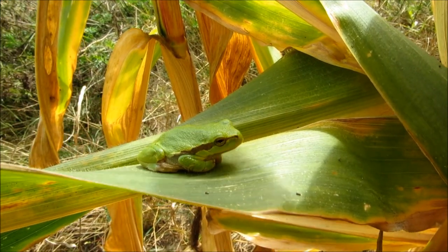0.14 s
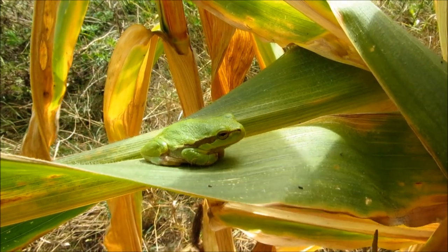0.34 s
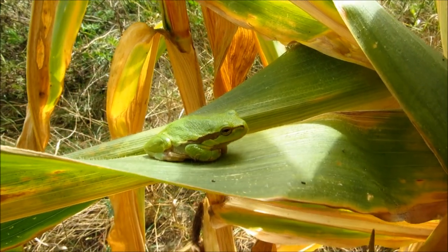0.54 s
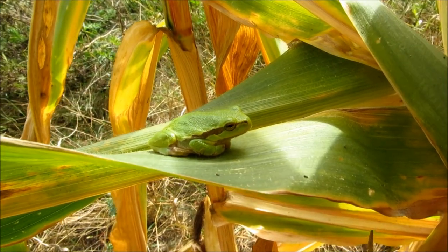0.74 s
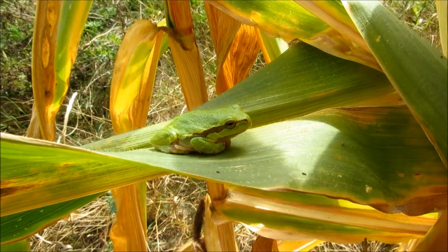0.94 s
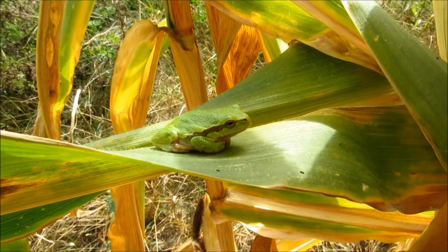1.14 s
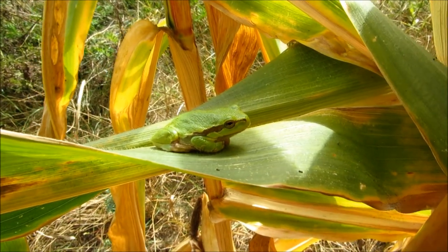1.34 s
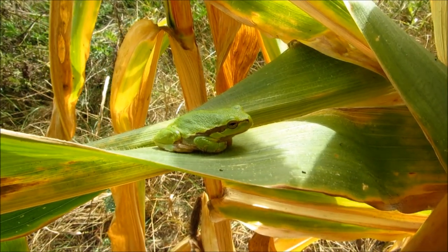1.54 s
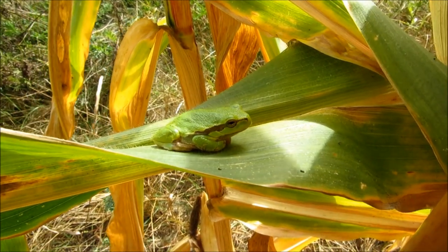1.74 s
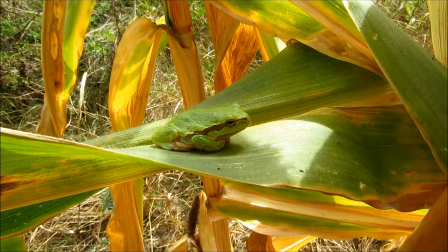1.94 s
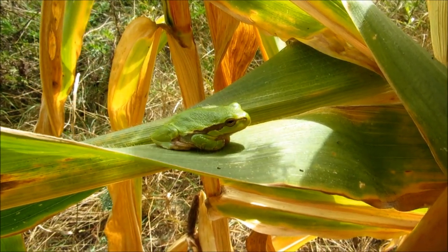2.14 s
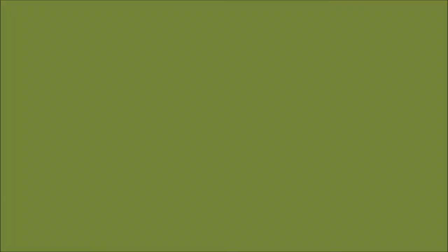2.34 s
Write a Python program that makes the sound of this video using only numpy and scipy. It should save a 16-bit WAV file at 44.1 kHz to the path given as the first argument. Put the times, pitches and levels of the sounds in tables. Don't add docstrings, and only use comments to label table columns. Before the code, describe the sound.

Dry maize leaves rustle and crackle close to a stereo microphone outdoors; small snaps and soft hollow stalk knocks come unevenly, wind bumps low at first, then a sharp tear near the middle, and calmer hiss until a quick fade.

```python
import sys
import numpy as np
from scipy import signal
from scipy.fft import rfft, irfft
from scipy.io import wavfile
from scipy.ndimage import uniform_filter1d

SR = 44100
rng = np.random.default_rng(int(sys.argv[2]) if len(sys.argv) > 2 else 0)


def linear_from_db(decibels):
    return 10 ** (np.asarray(decibels, float) / 20)


def store_wav(level_fs):
    pcm = np.round(np.clip(np.atleast_2d(level_fs), -1, 1) * 32767)
    wavfile.write(sys.argv[1], SR, pcm.T.astype(np.int16))


N = 105840
TIME_S = np.arange(N) / SR
NEAR_SIDE_DB = -8

# t/s, level/dB, brightness/dB
BREEZE = [(0, -49, -4.5), (.2, -47, -5), (0.401, -49, -3.5), (.6, -47.5, -6), (.8, -44.5, -4),
          (0.961, -48, -5), (1.1, -44, -2), (1.25, -47.5, -4), (1.45, -46.5, -1), (1.7, -47, -2),
          (1.85, -49, -2.5), (2.13, -47, -1)]
# f/Hz, density/dB
LEAF_MID = [(53, -49), (90, -13), (161, -6), (400, -5.5), (590, -7), (686, -4), (1370, -2.5), (9180, -5.5),
            (15800, -12.5)]


def evened(x):
    return x / np.sqrt(np.mean(x ** 2) + 1e-20)


def read(points, hz):
    f, value = np.transpose(points)
    return np.interp(np.log(hz + 1), np.log(f + 1), value, left=-90, right=-90)


def add(mix, s, sound):
    part = mix[..., round(s * SR):round(s * SR) + sound.shape[-1]]
    part += sound[..., :part.shape[-1]]


def colour(x, db_at):
    n = x.shape[-1]
    gain = linear_from_db(db_at(np.fft.rfftfreq(n, 1 / SR)))
    return irfft(rfft(x) * gain, n)


def ring(x, hz, width_hz):
    r = np.exp(-np.pi * width_hz / SR)
    return signal.lfilter([1, -1], [1, -2 * r * np.cos(2 * np.pi * hz / SR), r * r], x)


def sides(mid, side):
    return np.array([mid + side, mid - side])


def hump(hz, centre_hz, octaves):
    away = np.log2((hz + 1) / centre_hz) / octaves
    return -6 * np.where(away < 0, away / 1.9, away) ** 2


def broad(x):
    return colour(x, lambda f: hump(f, 5000, 1.15))


def fold_burst(noise, fade_s):
    t = np.arange(noise.shape[-1]) / SR
    rise_s = 0.00048
    return noise * np.minimum(t / rise_s, 1) * np.exp(-t / max(fade_s, 3e-4))


def tear():
    # t/s, peak/dB, fade/s
    steps = [
        (1.067, -29, .0015),
        (1.0695, -26.5, 0.00087),
        (1.07, -17.5, 0.0011),
        (1.0741, -15, 0.00094),
        (1.0750, -11.5, 0.00097),
        (1.0765, -12, 0.0012),
        (1.0778, -20, .001),
        (1.0812, -21, 0.0012),
        (1.084, -30.5, 0.0018),
        (1.0890, -29.5, .002),
    ]
    # f/Hz, width/Hz, level/dB
    leaf = [(2350, 230, -6), (2995, 150, 1), (3650, 430, 4.5), (4600, 220, -9), (4800, 140, -7.5),
            (5455, 150, -0.5), (6400, 150, -1.5), (6840, 130, -8), (8000, 150, -8.5), (9830, 160, -9),
            (10810, 130, -11.5), (12000, 470, -19)]
    wide_db, damping, dulls_db, top_db = 0, 1.4, -120, 2
    out = np.zeros((2, N))
    noises = rng.standard_normal((len(steps), 2, 1300))
    for (s, peak_db, fade_s), noise in zip(steps, noises):
        burst = fold_burst(noise, fade_s)
        body = sum(linear_from_db(db) * width_hz / hz * ring(burst, hz, damping * width_hz)
                   for hz, width_hz, db in leaf)
        wide = broad(burst)
        both = body / abs(body[0]).max() + linear_from_db(wide_db) * wide / abs(wide[0]).max()
        late_s = max(s - steps[4][0], 0)
        both = colour(both, lambda f: dulls_db * late_s * np.log2(np.maximum(f, 2500) / 2500)
                      - top_db * (f / 12000) ** 6)
        mid, side = both / abs(both[0]).max()
        add(out, s, linear_from_db(peak_db) * sides(mid, linear_from_db(NEAR_SIDE_DB) * side))
    return out


def snaps():
    # t/s, peak/dB, ring f/Hz, brightness/dB, fade/s
    pops = [(.035, -36, 3000, -0.5, 0.0022), (0.045, -31.5, 2600, -11.5, 0.0017),
            (0.108, -32, 2900, -2, 0.0014), (0.1173, -33, 2880, -10.5, 0.0012),
            (.1915, -35, 3040, -8, .0012), (.243, -36.5, 9000, -3.5, 0.00089),
            (0.1473, -27.5, 2760, -18, 0.0016), (0.4663, -24.5, 4450, -11, 0.0013),
            (0.5536, -27, 3180, -3, 0.0024), (.6125, -31.5, 3550, -6, 0.0017),
            (0.685, -32, 4030, -10, .0012), (.8245, -28.5, 3020, -4.5, 0.0013),
            (.8374, -32, 6700, 2, 0.00084), (0.873, -31.5, 3080, -10.5, .001),
            (0.931, -35.5, 6300, -4.5, .001), (0.9365, -34, 6300, -4, .0008),
            (.9892, -36, 2900, -5, 0.0011), (1.0233, -32, 2820, 4.5, 0.0018), (1.043, -27, 2820, -6, .0013),
            (1.1067, -29, 3500, -5.5, 0.0011), (1.139, -31.5, 6500, -7.5, 0.00099),
            (1.1781, -23.5, 2780, -9.5, 0.00079), (1.3234, -26.5, 3250, -17, .0011),
            (1.344, -33.5, 3220, -12, .0008), (1.381, -33, 2470, -6, 0.0011),
            (1.4135, -32, 2400, -10, .0015), (1.419, -35, 3300, -6, .0015),
            (1.5159, -25.5, 7800, 3, 0.00044), (1.871, -32, 6800, -9.5, 0.00079)]
    out = np.zeros((2, N))
    noises = rng.standard_normal((len(pops), 2, 1300))
    for (s, peak_db, leaf_hz, bright_db, fade_s), noise in zip(pops, noises):
        burst = fold_burst(noise, fade_s)
        body = ring(ring(burst, leaf_hz, 0.2 * leaf_hz), leaf_hz, leaf_hz)
        wide = broad(burst)
        mid, side = body / abs(body[0]).max() + linear_from_db(bright_db) * wide / abs(wide[0]).max()
        add(out, s, linear_from_db(peak_db - 0.5) * sides(mid, linear_from_db(NEAR_SIDE_DB) * side))
    return out


def knocks():
    # t/s, peak/dB, ring length/(share of t60), tone/(dB per octave), top ring f/Hz
    blows = [(.0352, -33, .25, 5, 2100), (.071, -32, .4, -1, 1960), (.3303, -28, 0.56, 0, 2150),
             (.3322, -25, 0.56, 3.5, 2120), (0.3383, -29.5, 0.64, 10, 2150), (0.341, -30.5, .6, 2.5, 2100),
             (0.3487, -28.5, 0.42, 3.5, 2080), (.3521, -19.5, .6, 2.5, 2080), (.3555, -31, .6, -1, 2020),
             (0.466, -24.5, 0.56, 4, 1960), (0.5036, -26, .6, 3, 1840), (.5053, -23, .7, 3, 1840),
             (.508, -24, .45, 1, 1850), (.5538, -26.5, .3, 0, 1960), (.577, -27, 0.6, 6, 2110),
             (.722, -26.5, 0.68, 0.5, 1800), (.7618, -28, .35, 2, 2000), (.7985, -25.5, .5, 6, 2170),
             (0.819, -29, 0.78, 3, 1960), (1.076, -24, 0.5, -3, 1960), (1.107, -26, 0.4, -0.5, 1960),
             (1.3232, -26.5, 0.27, -1, 1670), (1.3262, -32.5, 0.43, -13, 1960),
             (1.3437, -28, 0.33, 1, 1960), (1.5161, -28.5, .4, 3, 1680), (1.519, -37, 0.31, 4, 1700),
             (1.8, -27.5, .3, -3, 1960)]
    # f/Hz, level/dB, t60/s
    stalk = [(408, -7.5, 0.044), (764, -4, 0.029), (1062, -0.5, 0.032), (1306, -2.5, 0.021),
             (1960, -1.5, 0.018)]
    spread_db, pan_db, tick_db = 1.2, -4, -9
    ragged, ragged_s, contact_s = 0.12, 0.0019, 0.00021
    out, t = np.zeros((2, N)), np.arange(2200) / SR
    luck = rng.standard_normal((len(blows), len(stalk), 2))
    noises = rng.standard_normal((len(blows), len(t)))
    for (s, peak_db, rings, tone_db, top_hz), chance, noise in zip(blows, luck, noises):
        share = max(rings, .1)
        blow = ragged * noise * np.exp(-t / ragged_s) + (t == 0)
        modes = [*stalk[:-1], (top_hz, *stalk[-1][1:])]
        body = np.zeros(len(t))
        for (hz, db, t60_s), (u, v) in zip(modes, chance):
            mode_db = db + tone_db * np.log2(hz / stalk[2][0]) + spread_db * u
            width_hz = 2.09 / t60_s / share
            body += linear_from_db(mode_db) * hz * ring(blow, hz * (1 + 0.013 * v), width_hz)
        soft_s = contact_s * share
        body = np.convolve(body, np.exp(-(t[:60] / soft_s - 2) ** 2))[:len(t)]
        tick = broad(np.roll(blow, 20))
        sound = body / abs(body).max() + linear_from_db(tick_db) * tick / abs(tick).max()
        add(out, s, linear_from_db(peak_db + np.array([[.5], [-.5]]) * pan_db) * sound)
    return out


def scrapes():
    # start t/s, length/s, rms/dB, centre f/Hz, spread/octaves
    strokes = [(0.035, 0.065, -47.5, 2970, 1.17), (0.105, 0.038, -47.5, 2820, 0.97),
               (0.189, 0.039, -51.5, 3000, 0.44), (0.252, 0.092, -44, 5100, 0.69),
               (0.445, 0.055, -50, 3870, 0.86), (0.495, 0.052, -42.5, 2970, 1.26),
               (0.601, 0.057, -45, 4000, 0.71), (0.773, 0.11, -46.5, 2500, 1.15),
               (0.879, 0.031, -41.5, 1800, 1.1), (0.89, 0.043, -37.5, 3300, 1.2),
               (0.929, 0.021, -48, 6000, 1.2), (1.007, 0.092, -49.5, 3540, 1.3),
               (1.064, 0.023, -33, 4494, 1.4), (1.078, 0.029, -36.5, 2200, 1.43),
               (1.099, 0.05, -43.5, 2480, 0.83), (1.172, 0.035, -36, 4000, 1.52),
               (1.41, 0.02, -41.5, 2760, 1.27), (1.662, 0.1, -50.5, 3960, 1.5),
               (1.98, 0.071, -46.5, 2500, .9)]
    slips_per_s, slip_db = 16000, 1.6
    out = np.zeros((2, N))
    slips = linear_from_db(slip_db * np.minimum(rng.exponential(1, N), 4)) * (rng.random(N) < slips_per_s / SR)
    slips = slips * rng.standard_normal((2, N)) + .6 * rng.standard_normal((2, N))
    for start_s, length_s, db, centre_hz, octaves in strokes:
        u = np.arange(0, length_s, 1 / SR) / length_s
        part = slips[:, round(start_s * SR):][:, :len(u)]
        part = colour(part, lambda f: hump(f, centre_hz, octaves))
        swell = np.sin(np.pi * u ** 0.69) ** 2
        mid, side = part / np.std(part[0]) * swell
        add(out, start_s, linear_from_db(db + 4.0) * sides(mid, linear_from_db(NEAR_SIDE_DB) * side))
    return out


def crackle():
    ticks_per_s, level_db, spread_db, side_db = 1400, -9, 3.6, -9
    size = linear_from_db(spread_db * np.minimum(rng.exponential(1, N), 4)) * (rng.random(N) < ticks_per_s / SR)
    clumps = linear_from_db(2.5 * evened(uniform_filter1d(rng.standard_normal(N), size=900)))
    leaf, out = rng.integers(0, 24, N), np.zeros((2, N))
    pitches_hz, places = np.geomspace(700, 11000, num=24), rng.uniform(-1, 1, size=24)
    for k, (hz, place) in enumerate(zip(pitches_hz, places)):
        tick = ring(size * clumps * (leaf == k), hz, 0.58 * hz) * np.sqrt(hz)
        out += [tick, linear_from_db(side_db) * 2 * place * tick]
    out = colour(out, lambda f: 1.1 * read(LEAF_MID, f))
    s, breeze_db, _ = np.transpose(BREEZE)
    gain = linear_from_db(level_db + np.interp(TIME_S, s, breeze_db))
    return sides(*(out / np.std(out[0]) * gain))


def hiss(shape, follows, patchy_db, flicker_db):
    hop, size = 128, 512
    frames, hz = N // hop + 5, np.fft.rfftfreq(size, 1 / SR)
    a, b, patches = rng.standard_normal((frames, len(hz), 3)).T
    patches = uniform_filter1d(patches, size=14, axis=0)
    patches = evened(uniform_filter1d(patches, size=12, axis=1))
    flicker = evened(uniform_filter1d(rng.standard_normal(frames), size=4))
    s, level_db, bright_db = np.transpose(BREEZE)
    bright_db = np.interp(np.arange(frames) * hop / SR, s, bright_db)
    tilt_db = bright_db * np.log2(np.maximum(hz, 3000) / 3000)[:, None]
    z = (a + 1j * b) * linear_from_db(patchy_db * patches + flicker_db * flicker + follows * tilt_db)
    x = signal.istft(z, nperseg=size, noverlap=size - hop)[1][:N]
    x = evened(colour(x, lambda f: read(shape, f)))
    mean_db = np.mean(level_db)
    return x * linear_from_db(mean_db + follows * (np.interp(TIME_S, s, level_db) - mean_db))


def far_leaves():
    # f/Hz, density/dB
    leaf_side = [(59, -36), (100, -8.5), (301, 1.5), (3220, -5), (5240, -12.5), (6470, -12), (11000, -13),
                 (15800, -15)]
    mid = linear_from_db(2.5) * hiss(LEAF_MID, 1, patchy_db=1.15, flicker_db=1.41)
    side = linear_from_db(5.5) * hiss(leaf_side, 0.55, patchy_db=1.0, flicker_db=-2.0)
    return sides(mid, side)


def buffet():
    # t/s, level/dB
    gusts = [
        (0, -56),
        (.6, -61),
        (.9, -63.5),
        (1.3, -66.5),
        (1.7, -65.5),
        (1.85, -66),
        (2.12, -63),
    ]
    # f/Hz, density/dB
    pressure = [(7.1, -34.5), (12, -12.5), (27, -6.5), (49, 3), (68, -4), (250, -24.5), (320, -66.5),
                (550, -120)]
    side_db, mid_db, leak_db = 11, 3.5, -11
    s, db = np.transpose(gusts)
    noises = colour(rng.standard_normal((2, N)), lambda f: read(pressure, f))
    lumps = [evened(v) / np.sqrt(uniform_filter1d(evened(v) ** 2, size=3000) + 0.18) for v in noises]
    mid = linear_from_db(mid_db) * lumps[1] + linear_from_db(leak_db) * lumps[0]
    return linear_from_db(np.interp(TIME_S, s, db)) * sides(mid, linear_from_db(side_db) * lumps[0])


def eddies():
    # t/s, depth/dB, width/s
    dips = [(0.047, -27, 0.0065), (0.072, -33, 0.0095), (0.223, -50, 0.0215), (0.244, -32.5, 0.0045),
            (0.283, -49, 0.009), (0.317, -32, 0.0067), (0.365, -33.5, 0.016), (0.387, -26, 0.0057),
            (0.418, -29, 0.0063), (0.446, -32, 0.0076), (0.485, -36, 0.029), (0.506, -37, 0.0064),
            (0.565, -35, 0.013), (0.59, -36, 0.016)]
    # t/s, height/dB, width/s
    pushes = [(0.231, -34, 0.0072), (.272, -37, 0.0066), (.458, -31, 0.0062), (.495, -33, 0.0087),
              (.655, -37, 0.01), (.735, -45, 0.0055)]
    mid_db, rebound = -17.5, 0.85
    out = np.zeros(N)
    for sign, rows in ((-1.47, dips), (1, pushes)):
        for s, db, width_s in rows:
            u = ((TIME_S - s) / width_s) ** 2
            out += sign * linear_from_db(db) * (1 - 2 * rebound * u) * np.exp(-u)
    return sides(linear_from_db(mid_db) * out, out)


def scene():
    near = tear() + snaps() + knocks() + scrapes() + crackle()
    return near + far_leaves() + buffet() + eddies()


def top_cut(x):
    return signal.sosfilt(signal.butter(12, 15900, fs=SR, output="sos"), x)


def record(dry):
    # f/Hz, left over right/dB
    port_tilt = [(60, 0.36), (550, 0), (3000, -0.6), (8000, 1), (15000, 1.3)]
    # t/s, gain/dB
    ending = [(2.1332, -3.5), (2.133, -6.5), (2.142, -17.5), (2.151, -38.5), (2.186, -36), (2.203, -60),
              (2.21, -58), (2.212, -120)]
    edge_hz, mono_from_s = 15750, 2.143
    x = np.array([colour(port, lambda f: share * np.interp(f, *np.transpose(port_tilt)))
                  for port, share in zip(dry, (.5, -.5))])
    x = colour(x, lambda f: -90. * (f > edge_hz))
    wide = TIME_S < mono_from_s
    x = sides(x.mean(0), wide * (x[0] - x[1]) / 2)
    return top_cut(x * linear_from_db(np.interp(TIME_S, *np.transpose(ending))))


dry = scene()
out = record(dry)
store_wav(out)
```